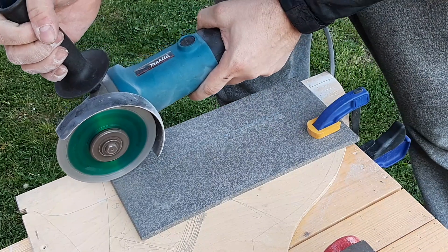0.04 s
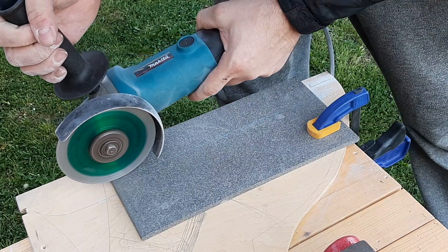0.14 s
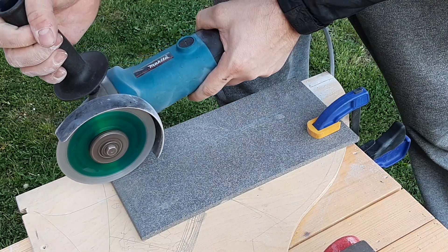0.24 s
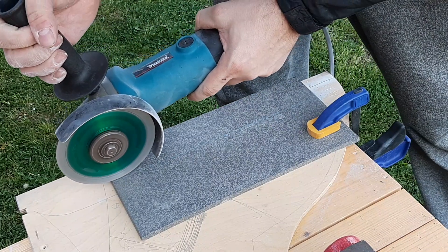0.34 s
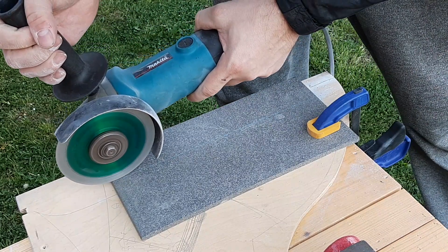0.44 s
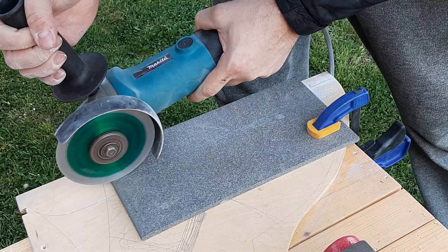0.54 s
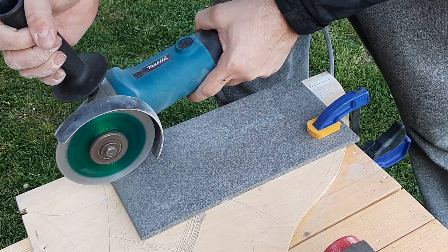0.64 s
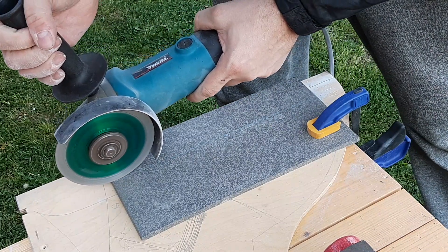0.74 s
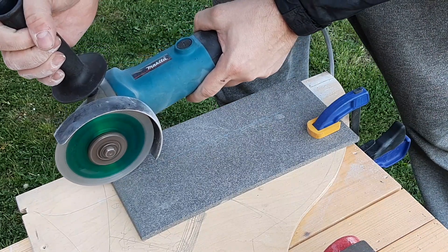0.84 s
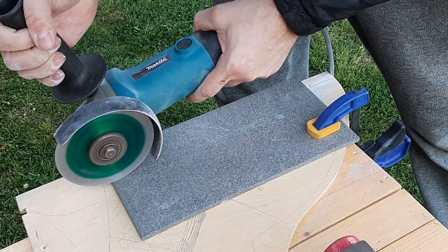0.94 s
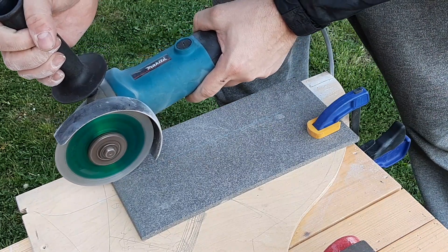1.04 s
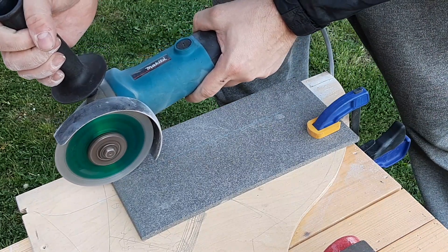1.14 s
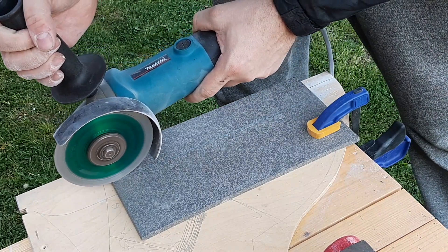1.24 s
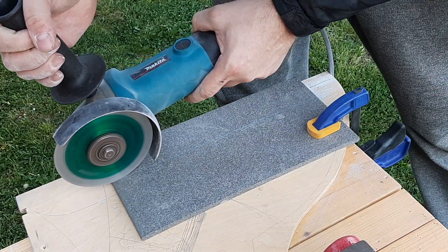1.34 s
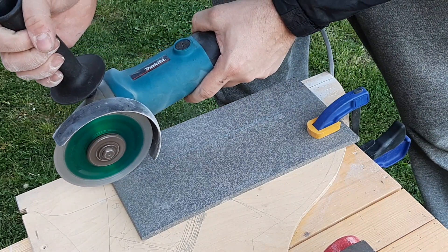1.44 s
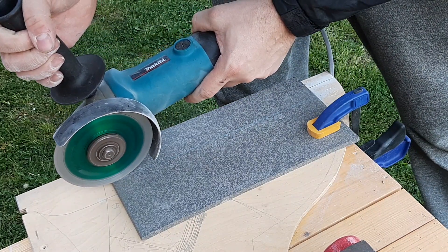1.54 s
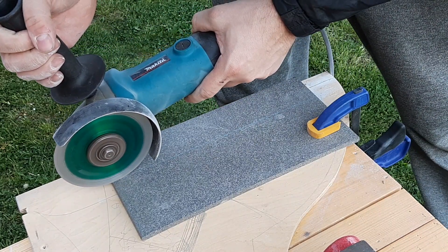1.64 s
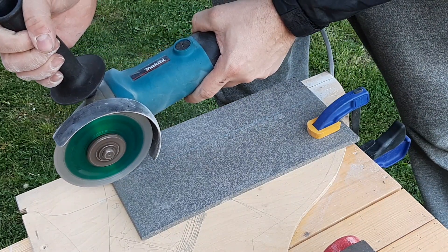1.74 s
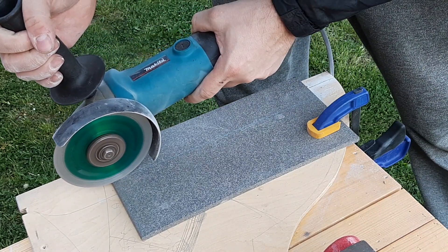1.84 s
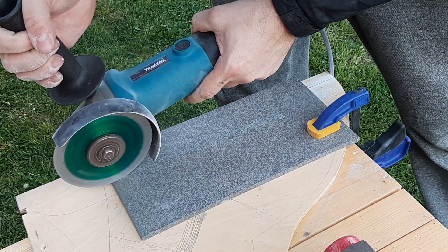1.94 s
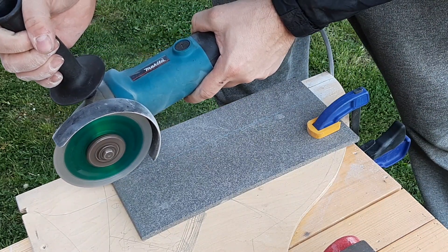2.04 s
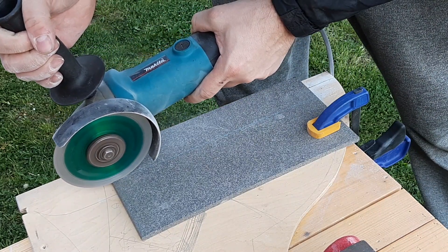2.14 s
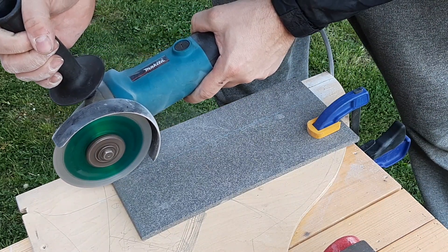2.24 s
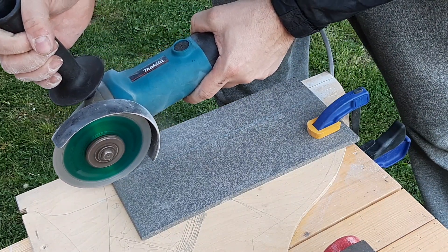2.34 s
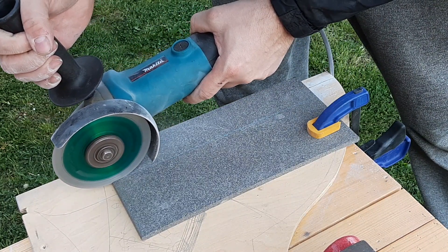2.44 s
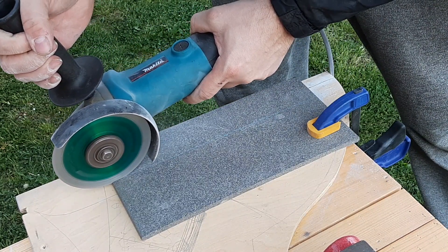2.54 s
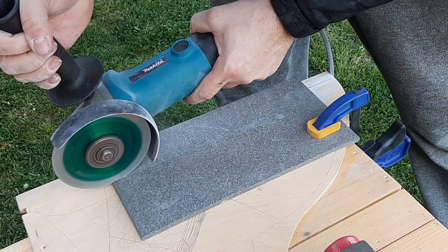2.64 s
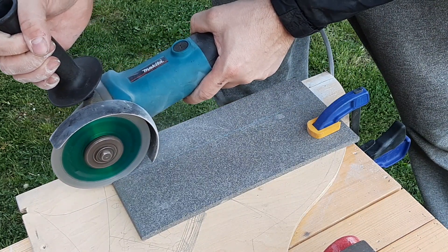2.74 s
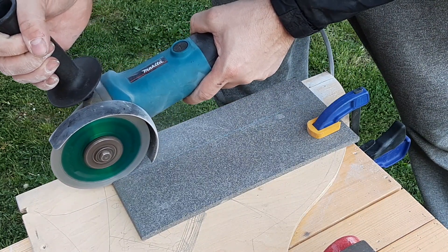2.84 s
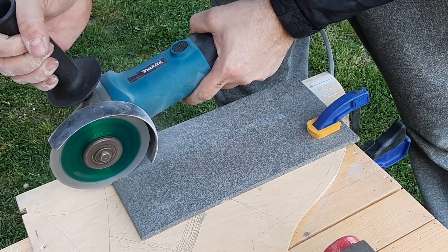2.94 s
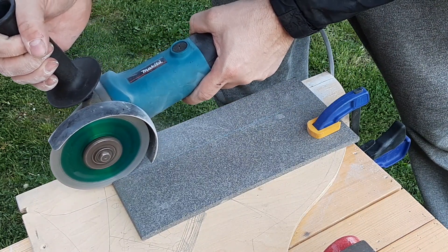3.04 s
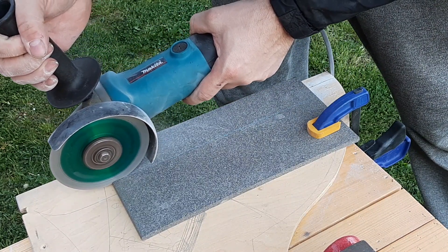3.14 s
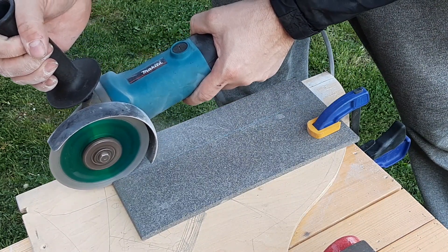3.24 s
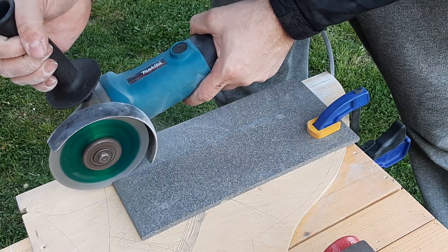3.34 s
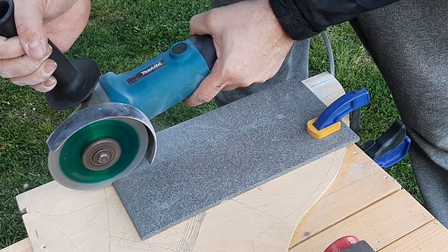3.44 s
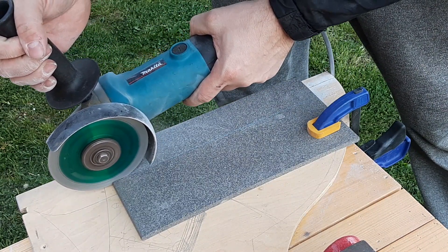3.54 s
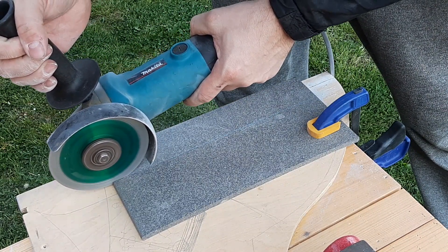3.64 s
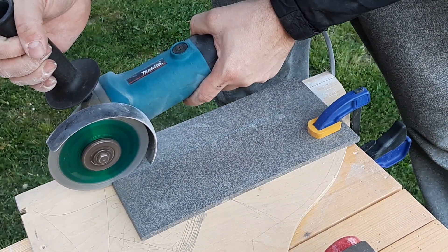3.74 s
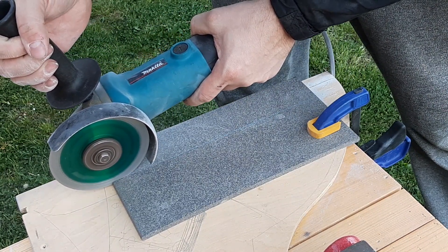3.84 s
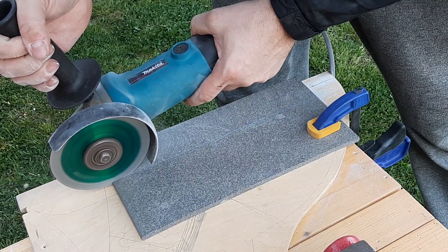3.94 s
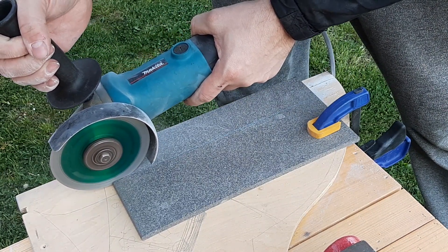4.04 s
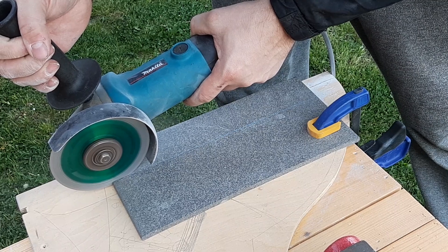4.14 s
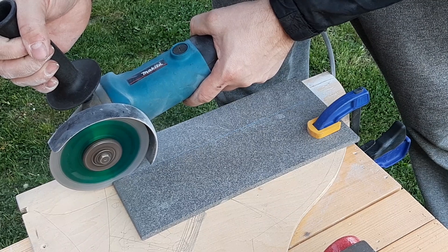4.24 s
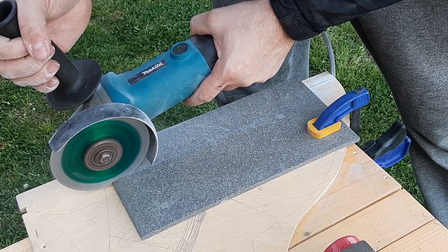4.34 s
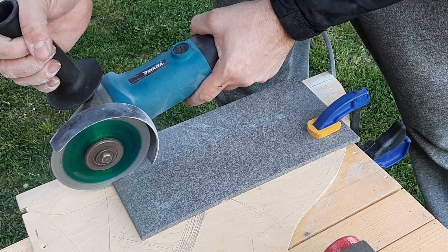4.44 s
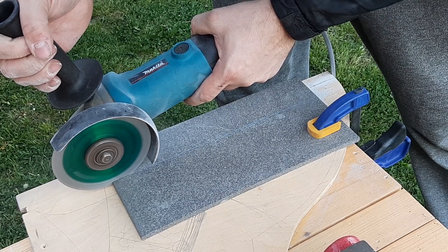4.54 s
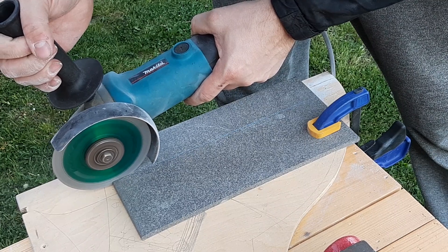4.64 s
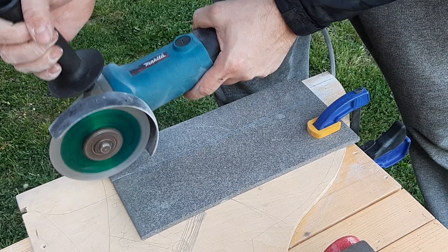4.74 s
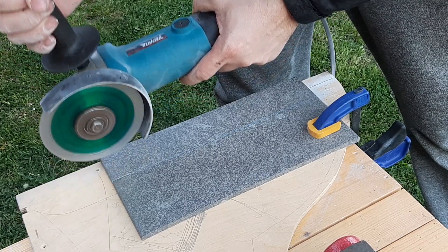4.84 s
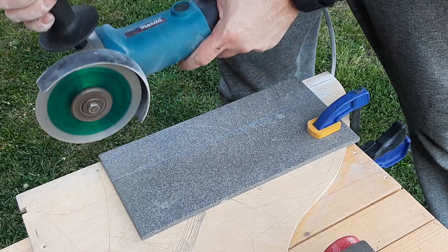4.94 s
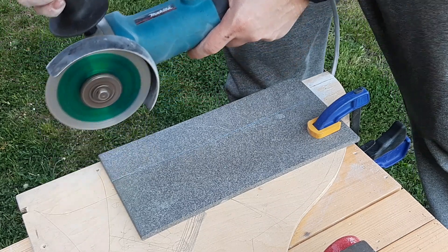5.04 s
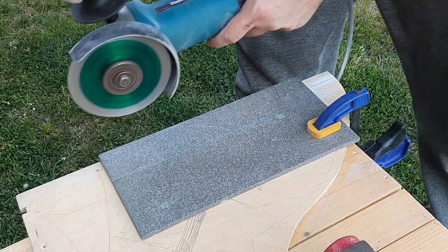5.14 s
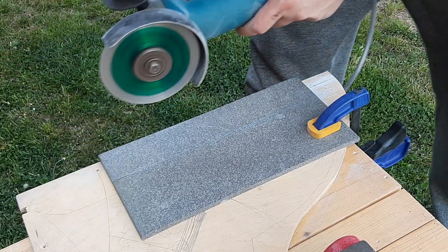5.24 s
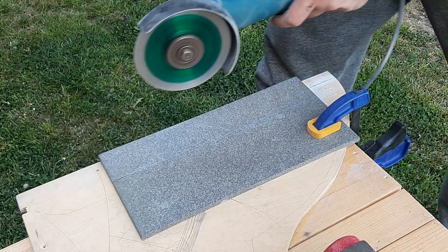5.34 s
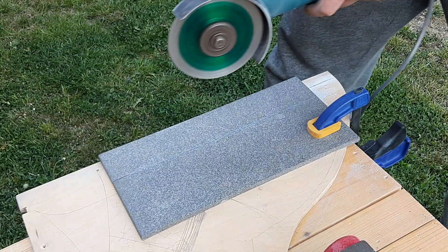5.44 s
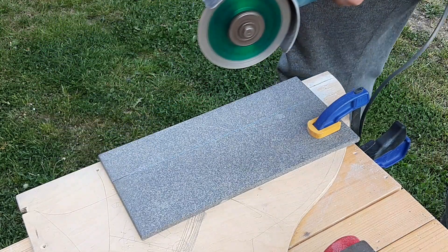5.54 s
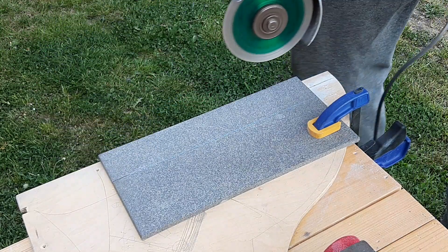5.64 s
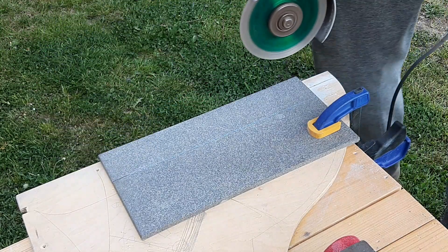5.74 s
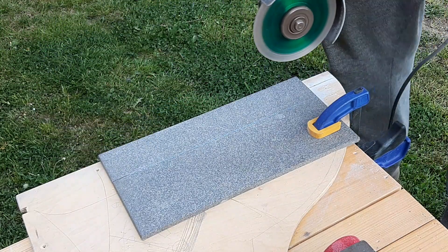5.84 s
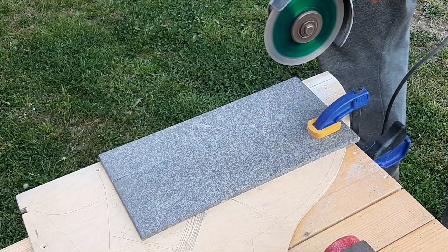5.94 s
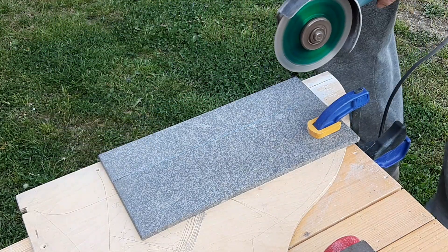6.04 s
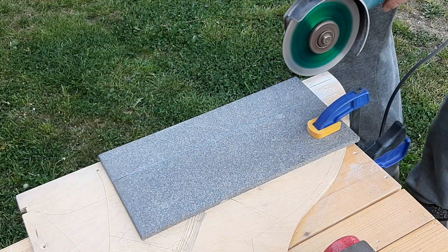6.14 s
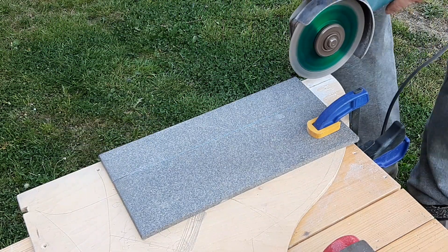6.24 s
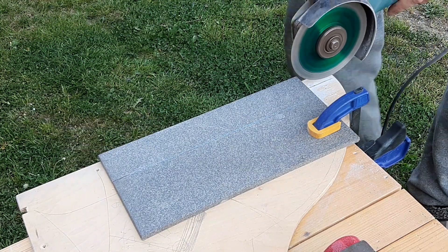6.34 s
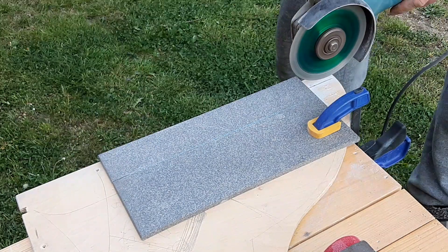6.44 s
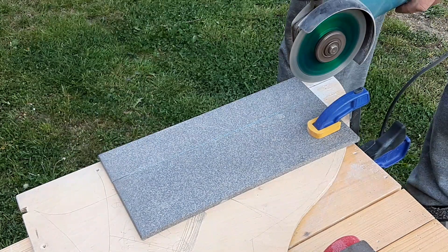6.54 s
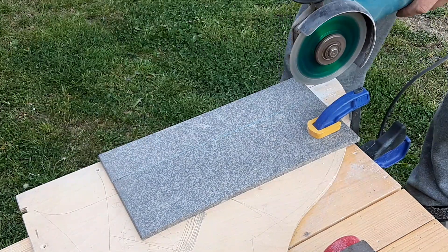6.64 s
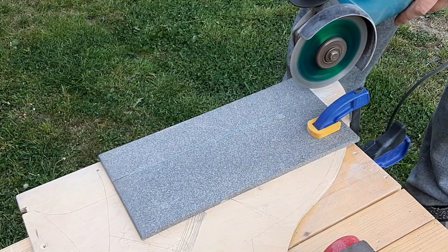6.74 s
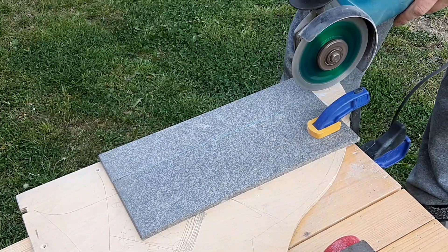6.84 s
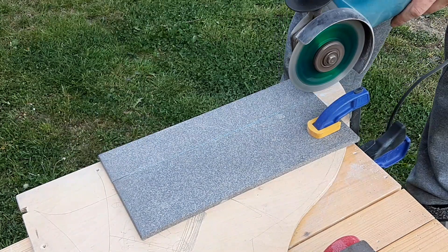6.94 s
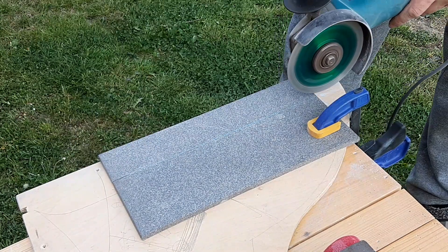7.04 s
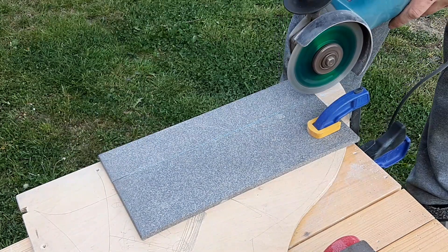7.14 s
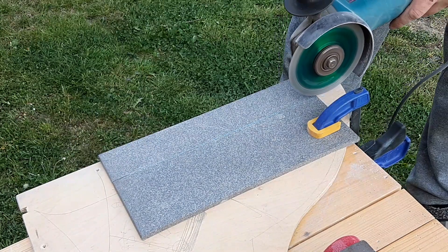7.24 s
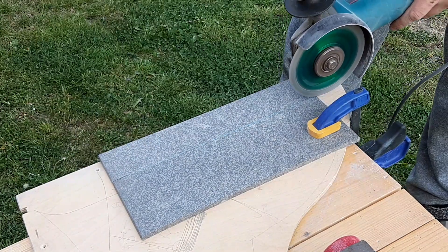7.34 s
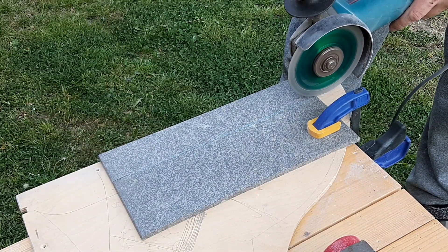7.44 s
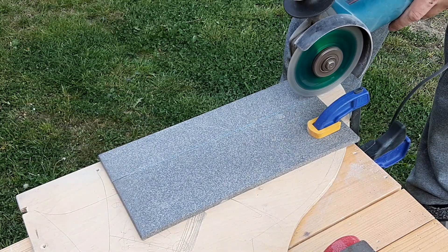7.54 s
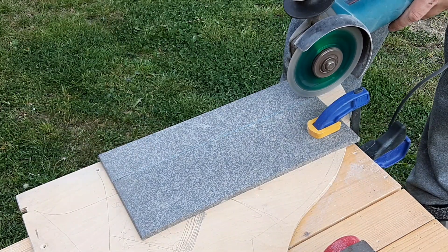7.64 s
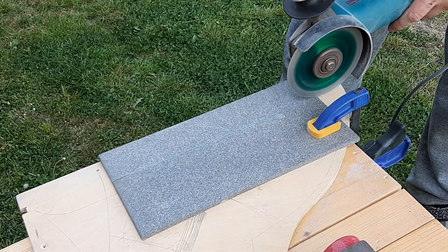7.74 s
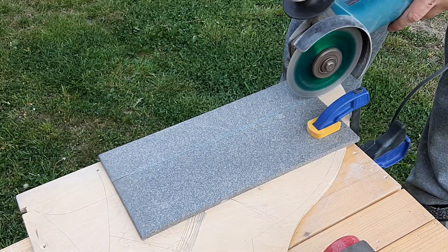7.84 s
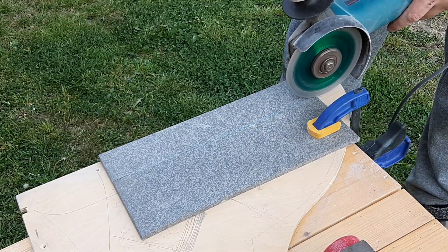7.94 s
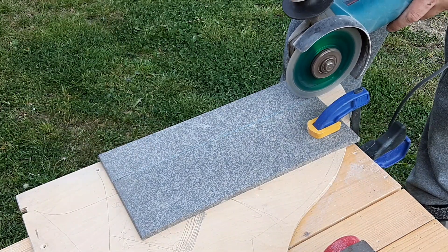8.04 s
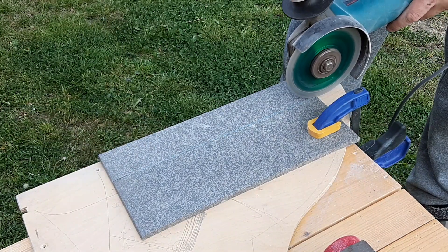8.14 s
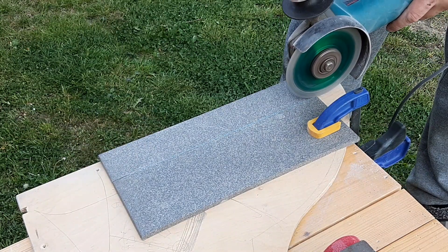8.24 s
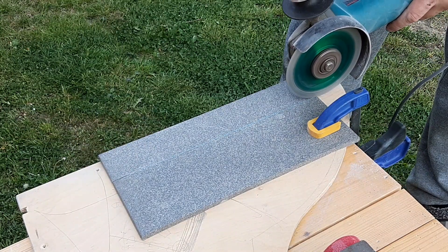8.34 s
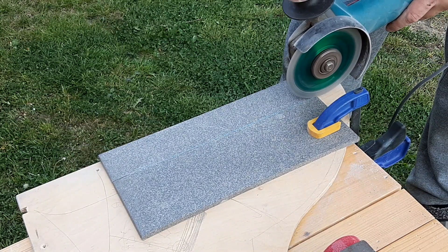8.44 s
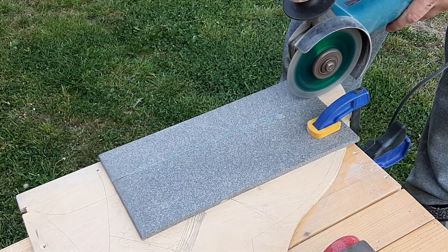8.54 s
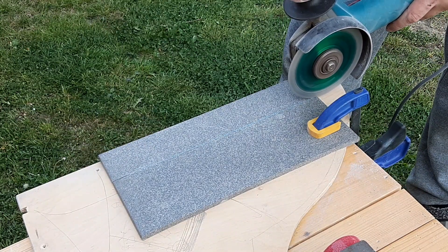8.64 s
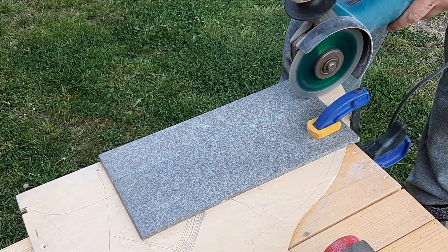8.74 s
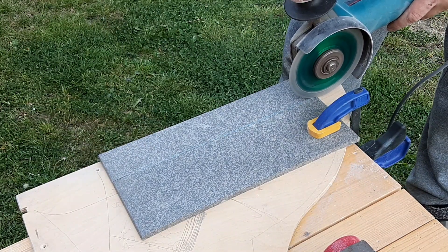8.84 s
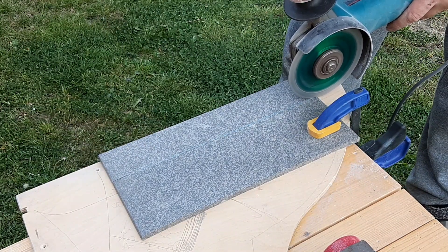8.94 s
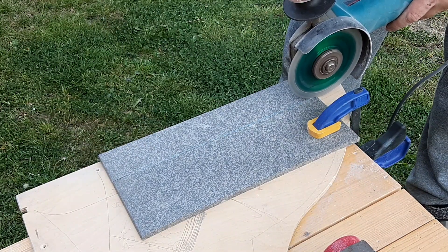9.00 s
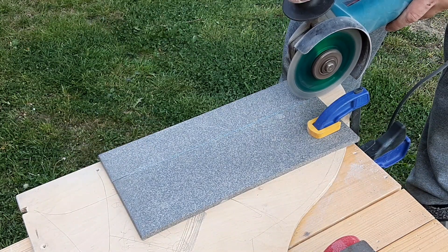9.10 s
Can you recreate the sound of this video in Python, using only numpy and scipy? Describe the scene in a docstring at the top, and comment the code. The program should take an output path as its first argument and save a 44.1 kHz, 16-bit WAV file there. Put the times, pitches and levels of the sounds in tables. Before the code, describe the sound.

A power grinder with a spinning disc is heard close and dry in stereo. Free-running whir and hiss give way to a light scrape, then a long harsh cut into stone, full of rapid chattering bites, steely ringing and hard low pops. After lifting, the hiss swells and a soft whistle appears while it is carried across. A second, thinner and smoother grinding cut follows and continues to the end.

```python
"""Two microphone ports stand close to a stone tile. An angle grinder hums and hisses at the near edge, then cuts:
the rim bites once a turn, rings the steel wheel and grinds, and hard bites pop in the ports.
It is lifted and carried to the far edge, a breathy whistle rising, and there it cuts again to the end.
Motor and rim tones are sines locked to the shaft; hiss and grinding are filtered noise; pops are shaped pulses."""
import sys
import numpy as np
from scipy import signal
from scipy.fft import rfft, irfft, next_fast_len
from scipy.io import wavfile
from scipy.ndimage import uniform_filter1d, map_coordinates

SR = 44100
rng = np.random.default_rng(int(sys.argv[2]) if len(sys.argv) > 2 else 0)


def put_to_file(sound):
    """Save the sound as 16-bit audio at rate SR, in the file named by the first command-line argument."""
    columns = np.atleast_2d(sound).T  # one column per channel
    safe = np.clip(columns, -1, 1)
    whole_steps = np.round(safe * 32767)
    wavfile.write(sys.argv[1], SR, whole_steps.astype(np.int16))


N = 404397

GEAR = 13 / 47  # wheel turns per shaft turn
TOP_HZ = 15780  # nothing is heard above this


def amp(db):
    """Amplitude factor of a level in dB."""
    return 10 ** (np.asarray(db) / 20)


def unit(x):
    """x scaled to an RMS of one."""
    return x / np.sqrt(np.mean(x ** 2) + 1e-20)


def along(points, hz):
    """Read (frequency [Hz], value) points on a log frequency axis."""
    f, v = np.transpose(points)
    return np.interp(np.log(hz + 1), np.log(f + 1), v)


def curves(rows):
    """One value per sample for each column after the time."""
    s, *cols = np.transpose(rows)
    return [np.interp(np.arange(N) / SR, s, c) for c in cols]


def ramp(start_s, length_s):
    """From 0 to 1 in a straight line."""
    return np.clip((np.arange(N) / SR - start_s) / length_s, 0, 1)


def wobble(rate):
    """A smooth random curve, rate knots a second."""
    steps = np.arange(0, N + 16, 16)
    knots = rng.standard_normal(int(N * rate / SR) + 4)
    return np.interp(np.arange(N), steps, map_coordinates(knots, [steps * rate / SR]))


def filtered(x, response):
    """x times a complex response of frequency."""
    m = next_fast_len(N + 8192)
    return irfft(rfft(x, m) * response(np.fft.rfftfreq(m, 1 / SR)), m)[..., :N]


def spread(a, b, alike):
    """Left and right from two signals, with the given likeness."""
    turn = np.arccos(np.clip(alike, -1, 1)) / 2
    mid, side = np.cos(turn) * a, np.sin(turn) * b
    return np.array([mid + side, mid - side])


def patchy(x, depth_db):
    """x with patches of random gain in time and frequency."""
    z = signal.stft(x, nperseg=512)[2]
    field = uniform_filter1d(rng.standard_normal(z.shape[-2:]), size=5, axis=0)
    field = uniform_filter1d(field, size=10, axis=1)
    return signal.istft(z * amp(depth_db * unit(field)), nperseg=512)[1][..., :N]


# the wheel digs in: (from [s], until [s], speed loss the shaft heads for [Hz])
DIG_INS = [(1.05, 4.7, 75), (7.95, 9.3, 60)]
FREE_HZ = 599.6  # shaft speed unloaded
SAG_S, RECOVER_S = 4.8, .62  # time constants of slowing under load and of speeding up after it


def sag():
    """Speed the shaft loses under each load and wins back after it, in Hz, both exponentially."""
    t = np.arange(N) / SR
    lost = 0
    for a, b, hz in DIG_INS:
        drag = 1 - np.exp(-(np.clip(t, a, b) - a) / SAG_S)
        lost = lost + hz * drag * np.exp(-np.maximum(t - b, 0) / RECOVER_S)
    return lost


# resonances of the housing: (frequency [Hz], width [Hz], lift near [dB], lift carried [dB], lift far [dB])
HOUSING_MODES = [(1730, 310, 1, 2.5, 1), (2040, 270, 1.5, -5, -0.5), (2760, 260, 0, -1, 3.5),
                 (3330, 690, 4.5, 4.5, 2.5), (3780, 300, -2.5, -1.5, 2.5), (4420, 290, 3.5, 3.5, 4.5),
                 (4860, 160, 6, 5, -0.5), (5600, 400, -3.5, 1.5, 1), (6120, 330, 5, 2.5, 1),
                 (6650, 320, 1, 2, 0), (11550, 750, 5, 2.5, 3)]
# likeness of the hiss at the two ports: (frequency [Hz], likeness [1 = same])
HISS_LIKENESS = [(100, 1), (1000, 0.9), (2500, 0.7), (5000, 0.52), (9000, 0.14), (15000, 0.19)]


def hiss(spectrum, order, lead_s, patchy_db):
    """Patchy air and gear noise through the housing; the left port hears it lead_s early."""
    size = 2 * next_fast_len(N // 2 + 512)
    hz = np.fft.rfftfreq(size, 1 / SR)
    a, b = patchy(rng.standard_normal((2, N)), patchy_db)
    lift_db = sum(db[order] / (1 + (2 * (hz - c) / w) ** 2) for c, w, *db in HOUSING_MODES)
    ports = spread(*rfft([a, b], size), along(HISS_LIKENESS, hz))
    ports = ports * np.exp(1j * np.pi * hz * lead_s * np.array([[1], [-1]]))
    # the treble leans left
    treble_left = amp(np.outer([.5, -.5], along([(7000, 0), (9000, 1.9)], hz)))
    return unit(irfft(ports * amp(along(spectrum, hz) + lift_db) * treble_left)[:, :N])


# level of the fan and gear hiss, heard lower while the wheel cuts: (time [s], level [dB])
HISS_LEVEL = [(0, -14), (.6, -14.5), (1.1, -21.5), (1.35, -25), (2, -28.5), (4.8, -26), (5.4, -25),
              (5.75, -23.5), (5.95, -20.5), (6.2, -17), (7.66, -15), (7.75, -25.5), (9.17, -29.5)]
# relative hiss spectrum at the near edge, in mid-air and at the far edge: (frequency [Hz], density [dB per Hz])
HISS_NEAR = [(60, -39), (150, -24), (300, -12), (500, -3.5), (800, -2), (1400, -0.5), (2100, 4), (2700, 0),
             (3500, 6), (4400, 4), (5500, 1.5), (7300, 0), (8300, -12.5), (11500, -9), (15600, -14.5)]
HISS_CARRIED = [(60, -58), (150, -34), (300, -20.5), (500, -15.5), (800, -1.5), (1400, 1.5), (2100, 4),
                (2700, 5.5), (3500, 4), (4400, 4), (5500, 0), (7300, -1.5), (8300, -12), (11500, -8),
                (15600, -12)]
HISS_FAR = [(60, -56), (150, -34.5), (300, -20.5), (500, -17.5), (800, -2), (1400, 1), (2100, 3), (2700, 2),
            (3500, 1.5), (4400, 3.5), (5500, 1), (7300, -0.5), (8300, -13), (11500, -9), (15600, -14)]
# a breathy whistle from the housing: (time [s], level against the hiss [dB])
WHISTLE_LEVEL = [(4.9, -35), (5.25, -14), (5.85, -6), (6.2, -13), (6.55, -23), (6.9, -11), (7.45, -10.5),
                 (7.7, -8)]
# the tool is carried across: (time [s], place [0 near edge - 1 far edge])
TOOL_PLACE = [(4.85, 0), (5.3, 0.5), (5.9, 1)]
# hum overtones: (shaft order, peak against the hiss at the near edge [dB], at the far edge [dB])
OVERTONES = [(2, -25, -28.5), (3, -29, -18), (5, -22.5, -23)]
LIFT_S, TURN_S, ARRIVE_S, SETTLE_S = 5.2, 0.081, 5.8, 0.24  # the housing turns away on lifting, back on arriving
HUM_NEAR_DB, HUM_FAR_DB = -11, -19.5  # the shaft's own tone against the hiss
HUM_FADE_DB_PER_HZ = 0.15  # it fades as the shaft sags
HUM_LAG_S = 0.063  # it follows the level of the hiss this late
HUM_FLUTTER_DB = 2.5  # it grows unsteady under load


def motor(turns, lost_hz):
    """Shaft hum, its overtones and the hiss, moving from the near edge to the far edge."""
    level_db = curves(HISS_LEVEL)[0]
    place = np.clip(curves(TOOL_PLACE)[0], 0, 1) * np.pi / 2
    lifted, arrived = ramp(LIFT_S, TURN_S), ramp(ARRIVE_S, SETTLE_S)

    air = np.sqrt(1 - lifted) * hiss(HISS_NEAR, order=0, lead_s=0.00013, patchy_db=1.37)
    air += np.sqrt(arrived) * hiss(HISS_FAR, order=2, lead_s=-0.000032, patchy_db=1.16)
    air += np.sqrt(np.abs(lifted - arrived)) * hiss(HISS_CARRIED, order=1, lead_s=0.00004, patchy_db=0.9)
    whistle = filtered(rng.standard_normal(N), lambda f: 1 / (1 + ((f - 3480) / 120) ** 2))
    air += amp(curves(WHISTLE_LEVEL)[0]) * unit(whistle)

    # half the gap between the ports, in shaft turns
    gap = np.outer([1, -1], 0.011 * np.cos(place) - 0.027 * np.sin(place))
    overtones = 0
    for k, near_db, far_db in OVERTONES:
        tone_db = near_db + (far_db - near_db) * arrived + 2.4 * wobble(27)
        overtones = overtones + amp(tone_db) * np.sin(2 * np.pi * k * (turns + gap))

    loaded = sum(ramp(a, 0.12) * (1 - ramp(b, .05)) for a, b, _ in DIG_INS)
    hum_db = np.interp(np.arange(N) - HUM_LAG_S * SR, np.arange(N), level_db)
    hum_db += HUM_NEAR_DB * np.cos(place) ** 2 + HUM_FAR_DB * np.sin(place) ** 2
    hum_db -= HUM_FADE_DB_PER_HZ * lost_hz
    hum_db += (0.26 + HUM_FLUTTER_DB * loaded) * wobble(18)
    hum = np.sqrt(2) * amp(hum_db) * np.sin(2 * np.pi * (turns + gap))
    return amp(level_db + 0.33 * wobble(6.6) + 0.17 * wobble(25)) * (air + overtones) + hum


# the hardest bites; thuds are peak pressures, the sign is their direction:
# (time [s], left thud [full scale], right thud [full scale], knock frequency [Hz], knock strength [relative])
HARD_POPS = [(1.035, -0.37, -.05, 400, .03), (1.16, -0.19, -.07, 396, .02), (1.379, -0.32, -0.13, 540, .06),
             (1.463, .2, 0.0099, 900, .06), (1.487, -0.22, .25, 540, 0.096),
             (1.707, -.26, -0.26, 1410, 0.15), (1.787, -.5, .25, 800, .06), (1.847, -0.23, -0.2, 880, 0.23),
             (2.013, -.2, -.3, 1020, .17), (2.024, .37, .15, 500, .06), (2.153, .23, -.3, 410, .03),
             (2.229, -0.029, -0.44, 590, .06), (2.321, -.22, -0.066, 440, 0.076),
             (2.414, .25, -.14, 1100, 0.11), (2.444, 0.079, 0.15, 1040, .15),
             (2.475, -0.18, -0.051, 860, 0.19), (2.675, 0.33, -0.037, 480, 0.075),
             (2.689, -0.45, -.4, 900, .12), (2.701, .14, .14, 890, .08), (2.913, .15, -.2, 1390, 0.15),
             (3.088, .08, 0.17, 800, 0.16), (3.425, -0.03, -.12, 523, .15), (3.435, -0.12, .05, 560, 0.16),
             (3.474, -0.15, 0.19, 710, .08), (3.52, -0.014, 0.22, 1260, 0.21),
             (3.533, -0.22, -.13, 450, 0.09), (3.699, -.2, .05, 400, .05), (4.171, .2, 0.18, 1110, .08),
             (4.279, .15, 0.068, 834, 0.17), (4.667, .1, .14, 1200, 0.058),
             (7.915, 0.13, -0.034, 400, 0.015), (7.944, 0.061, -0.17, 400, .02),
             (8.504, -0.27, -0.12, 1350, 0.13), (9.0, -0.16, -0.055, 1110, 0.11)]
# what a small pop wakes in tile and board: (frequency [Hz], width [Hz], gain before scatter [dB])
TILE_KNOCKS = [(510, 420, 9.5), (895, 570, 16), (1630, 1300, 16)]
KNOCK_CYCLES = 4.1  # a hard bite's knock dies by 60 dB in twice this many cycles


def pops(small):
    """Each pop is a sharp push that sags back within a few milliseconds, with a short knock of tile and board."""
    s, left, right, hz, knock = np.transpose(HARD_POPS)
    at = np.round(s * SR).astype(int)

    def port(f):
        """The port loses steady pressure and dulls the treble."""
        leak = (1j * f / 55 / (1 + 1j * f / 55)) ** 4
        return leak / (1 + 1j * f / 250) ** 0.36 / (1 + 1j * f / 1100) ** 2

    push = amp(21.5 + 1.4 * rng.standard_normal(N)) * small
    port_peak = np.abs(irfft(port(np.fft.rfftfreq(8192, 1 / SR)))).max()
    push[:, at] += np.array([left, right]) / port_peak

    span = np.arange(600)
    cycles = np.outer(hz, span / SR)
    ring = 1.75 * np.sin(2 * np.pi * cycles) * amp(-30 * cycles / KNOCK_CYCLES)
    hard = np.bincount((at[:, None] + span).ravel(), (knock[:, None] * ring).ravel(), N)

    knocks = 0
    for c, w, db in TILE_KNOCKS:
        struck = small * amp(4.8 * np.clip(rng.standard_normal(N), -2, 1.2))
        mode = lambda f: 1j * f * w / (c * c - f * f + 1j * f * w)
        knocks = knocks + amp(db) * filtered(struck, mode)
    return filtered(push, port) + knocks + hard


def bites(turns, scatter_db, bite_turns, rub, chatter_db):
    """Contact force: the rim's high spot bites once a turn, over a steady rub, while the hands let it chatter."""
    size = amp(scatter_db * rng.standard_normal(int(turns[-1]) + 1))[turns.astype(int)]
    force = rub + size * np.exp(-(turns % 1) / bite_turns)
    chatter = wobble(90) + 0.97 * wobble(30) + 0.82 * wobble(7.2)
    return unit(force * amp(chatter_db * chatter))


# modes of the wheel: (frequency [Hz], lead of the left port in the first cut [radians], in the second [radians])
WHEEL_MODES = [(2200, 1.6, 0.9), (3300, 2.5, -1.5), (3450, 2.8, -0.8), (4190, -2.8, -2.3),
               (4330, -2.8, -1.8), (4570, -2.6, -0.8), (4850, -2.6, -1), (5140, 2.6, -1.3),
               (5470, -2.0, -0.9), (6360, -2.4, 2.3), (6567, -0.5, -1.5), (7300, 1.0, 0.7), (7600, .7, 0),
               (7870, 0.4, -2.9), (8350, 0, 0), (9345, -0.4, -1.4), (9590, -0.2, 2.8), (11270, 1.6, -2.5),
               (11615, -2.4, -0.4), (11800, -1.2, -0.3), (12520, 0, 0), (13100, 2.4, -1.8),
               (13800, 0.5, 1.2), (15450, -2.2, -0.2), (15690, -2, 0)]
# the same modes, relative strengths: (width [Hz], shallow [dB], deep [dB], second cut [dB])
MODE_STRENGTHS = [(83, -2, -2, -2.5), (90, 6, 6.5, 0), (83, -5, 9.5, 1.5), (90, -12, 13, 9),
                  (90, 16.5, 11, 8), (90, -3, 0, 1), (90, -2, 0, -2), (86, 7, 11, 9.5), (150, -18, -24, 1),
                  (80, -6, 2.5, 7), (83, 6.5, -8, -3), (83, -13, -1, -2), (90, -8, -12, -10),
                  (90, -15, -4, -4), (90, -17, -10, -13), (96, -2.5, -0.5, -2), (119, -7, -1, 3.5),
                  (90, -5, 7, 7), (90, 1, 2.5, 8), (90, 8, -19, 4.5), (120, -14, -10, -15),
                  (120, -9, 2, -1), (110, -1, 2, 3), (100, -2, 4.5, 1), (80, -1, -6, -8)]


def ringing(level_cols, which, left_db):
    """The wheel's modes as each port hears them, once for each set of strengths; the treble leans left."""
    hz, lead = np.transpose(WHEEL_MODES)[[0, 1 + which]]
    width, db = np.transpose(MODE_STRENGTHS)[0], np.transpose(MODE_STRENGTHS)[level_cols]
    ports = amp(np.outer([.5, -.5], left_db * (hz > 7000))) * np.exp(1j * np.outer([.5, -.5], lead))
    gains = amp(db)[:, None] * ports  # set, port, mode
    return lambda f: gains @ np.array([1j * f * w / (c * c - f * f + 1j * f * w) for c, w in zip(hz, width)])


# rim on stone; treble is each port's RMS above 9 kHz less 3 dB, pops are before the gains in pops():
# (touch [s], attack [s], lift [s], treble at first [dB], treble at last [dB],
#  small pops at first [dB], small pops once dug in [dB])
CONTACTS = [(.6, 0.039, 4.73, -28.5, -25, -28.5, -14), (7.62, 0.12, 9.3, -22, -27.5, -34.5, -22)]
# relative broad grinding noise, a list for each cut: (frequency [Hz], density [dB per Hz])
GRIND_SPECTRA = ([(60, -37), (200, -16.5), (500, -2), (900, -8.5), (1400, -2.5), (2100, -2), (2700, -3.5),
                 (3300, 1), (3800, -1), (4300, 2.5), (4700, 0.5), (5500, -3), (6200, -5), (7300, -7.5),
                 (7850, -8.5), (8060, -29), (8400, -12.5), (11500, -6.5), (15600, -7.5)], [(60, -41),
                 (200, -48), (500, -16), (900, -4.5), (1400, -5), (2100, -1), (2700, -4), (3500, 1),
                 (3900, -5), (4400, -7), (4750, 1), (5500, 4), (6150, -2.5), (7300, -5), (7850, -10),
                 (8150, -26), (8400, -11), (11500, -5), (15600, -5)])
# tones, a list for each cut: (multiple of the wheel speed, peak against the cut's treble setting [dB])
WHEEL_TONES = ([(1, -21), (3, -26), (4, -14)], [(1, -31), (2, -30), (3, -26), (4, -19), (5, -20), (10, -20),
               (12, -10), (13, -12), (17, -18), (18, -15), (21, -11), (24, -13), (25, -8), (26, -7),
               (27, -8), (28, -11), (31, -8)])
# grit noise that repeats every turn: (first cut [share of power], second cut [share of power])
REPEATING = (.08, .16)
RELEASE_S, EASE_S = 0.052, 0.07  # the touch ends over RELEASE_S; pressure starts to ease EASE_S before the lift
POPS_GROW_S, POPS_WAVER_DB = 0.58, 1  # small pops grow after digging in
TONES_GROW_S, TONES_WAVER_DB = .35, 2  # tones grow from just before digging in


def cut(turns, force, which, levels, grind_db, alike, patchy_db):
    """One cut: grit noise, part of it the same every turn, rings the wheel and grinds; small pops mark each turn."""
    touch_s, attack_s, lift_s, first_db, last_db, light_db, dug_db = CONTACTS[which]
    dig_s = DIG_INS[which][0]
    onset = ramp(touch_s, attack_s)
    pressed = 1 - ramp(lift_s - EASE_S, RELEASE_S)
    touch = onset * (1 - ramp(lift_s, RELEASE_S))
    touch *= amp(first_db + (last_db - first_db) * ramp(touch_s, lift_s - touch_s))

    rim = rng.standard_normal(256)[(turns % 1 * 256).astype(int)]  # one roughness value per 1/256 turn
    share = REPEATING[which]
    grit = np.sqrt(1 - share) * rng.standard_normal((3, N)) + np.sqrt(share) * rim * [[1], [1], [0]]
    grit = patchy(force * grit, patchy_db) * touch

    cols, weights = levels
    rung = filtered(grit[0], ringing(cols, which, left_db=3.5))
    ring = sum(weight * one for weight, one in zip(weights, rung))
    lean_db = np.array([[1], [-1]])
    broad = filtered(spread(grit[1], grit[2], alike), lambda hz: amp(along(GRIND_SPECTRA[which], hz) + lean_db))
    sound = ring + amp(grind_db) * broad * pressed
    treble = filtered(sound, lambda hz: (hz > 9000) * (hz < TOP_HZ))
    sound *= np.sqrt(2 * np.mean(touch ** 2) / np.mean(treble ** 2))

    tones = 0
    for k, db in WHEEL_TONES[which]:
        tones = tones + amp(db + TONES_WAVER_DB * wobble(15)) * np.sin(2 * np.pi * k * turns)
    sound = sound + tones * touch * pressed * ramp(dig_s - .15, TONES_GROW_S)

    starts = np.flatnonzero(np.diff(turns.astype(int)))  # a new turn begins
    draw = rng.standard_normal((len(starts), 4))
    size = amp(4 * np.clip(draw[:, 2:3], -2, 1.5) + 2 * draw[:, 3:])
    pop_db = light_db + (dug_db - light_db) * ramp(dig_s, POPS_GROW_S) + POPS_WAVER_DB * wobble(3.83)
    strength = amp(pop_db) * onset * pressed
    small = np.zeros((2, N))
    small[:, starts] = unit(spread(*draw[:, :2].T, alike=-0.27) * size.T) * strength[starts]
    return sound, small


THIN_FROM_S, THIN_UNTIL_S = 3.78, 5.12  # for a while the low rumble thins out
THIN_HZ, THIN_WIDTH_HZ, THIN_SHARE = 435, 210, 0.53  # band centre, half width, share of amplitude removed


def scene():
    """Motor, two cuts and their pops, all driven by one shaft that slows under load."""
    lost_hz = sag()
    turns = np.cumsum(FREE_HZ - lost_hz) / SR
    wheel = GEAR * turns
    first = bites(wheel, scatter_db=4.0, bite_turns=0.4, rub=0.79, chatter_db=0.86)
    second = bites(wheel, scatter_db=3, bite_turns=0.31, rub=0.42, chatter_db=0.74)
    depth = ramp(0.75, 3.26)  # the sinking wheel shifts strength between its modes
    sinking = ([1, 2], np.sqrt([1 - depth, depth]))  # strength columns, their weights
    near_cut, near_pops = cut(wheel, first, which=0, levels=sinking, grind_db=1.5, alike=0.044, patchy_db=1.5)
    far_cut, far_pops = cut(wheel, second, which=1, levels=([-1], [1]), grind_db=-1.0, alike=0.061, patchy_db=1.34)
    sound = motor(turns, lost_hz) + near_cut + far_cut + pops(near_pops + far_pops)
    thin = THIN_SHARE * ramp(THIN_FROM_S, 0.06) * (1 - ramp(THIN_UNTIL_S, 0.51))
    return sound - thin * filtered(sound, lambda hz: 1 / (1 + ((hz - THIN_HZ) / THIN_WIDTH_HZ) ** 6))


def record(dry):
    """Peaks round off near full scale; nothing passes above the band limit."""
    held = dry / (1 + np.abs(dry / 0.98) ** 4) ** (1 / 4)
    return filtered(held, lambda hz: hz < TOP_HZ)


dry = scene()
out = record(dry)
put_to_file(out)
```